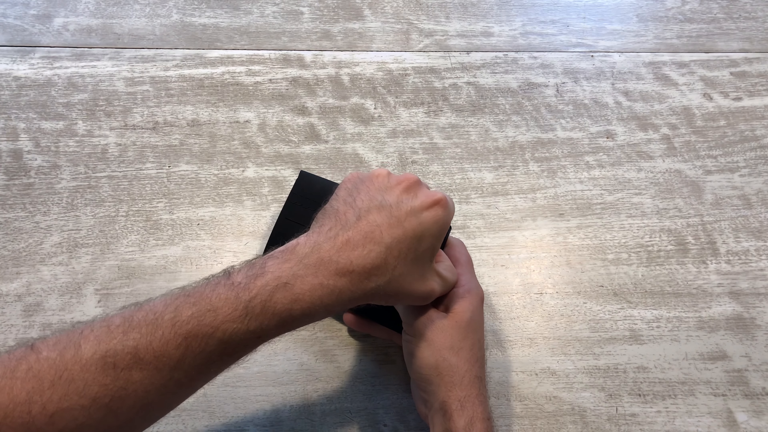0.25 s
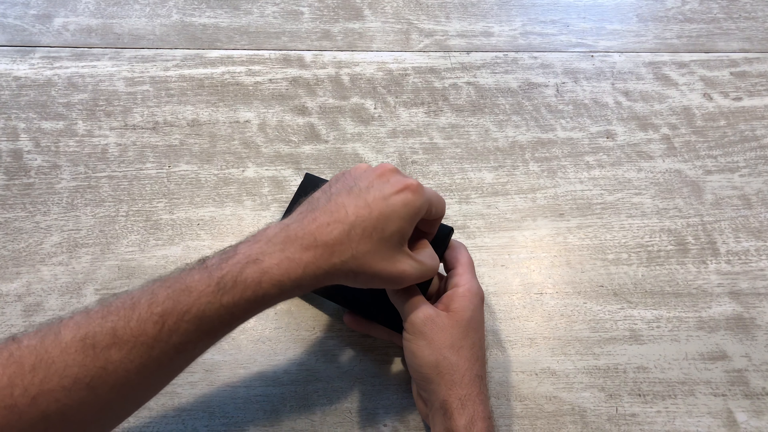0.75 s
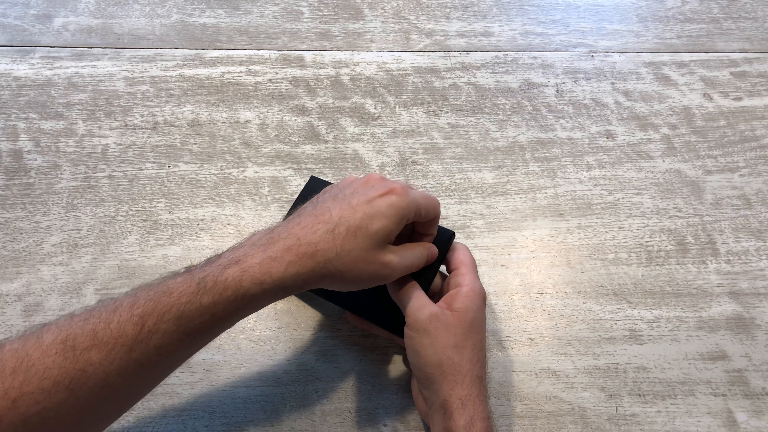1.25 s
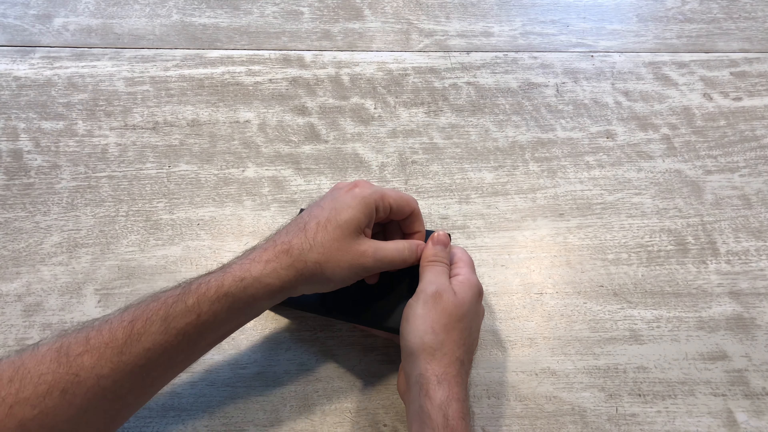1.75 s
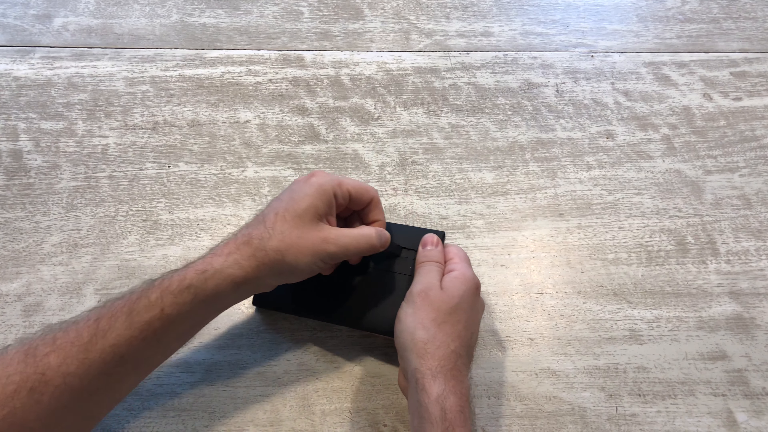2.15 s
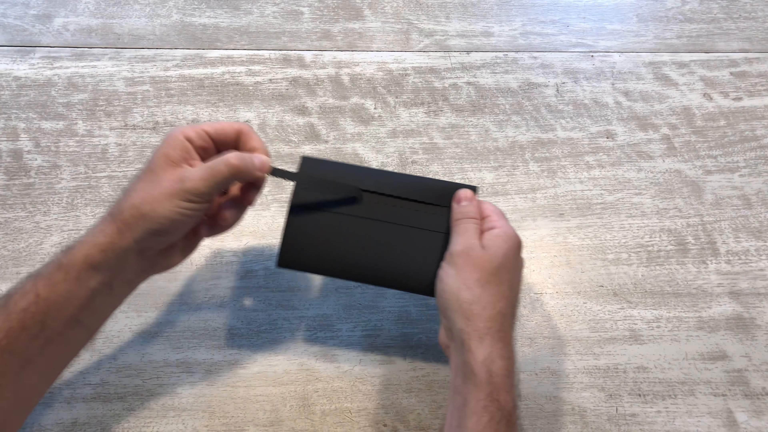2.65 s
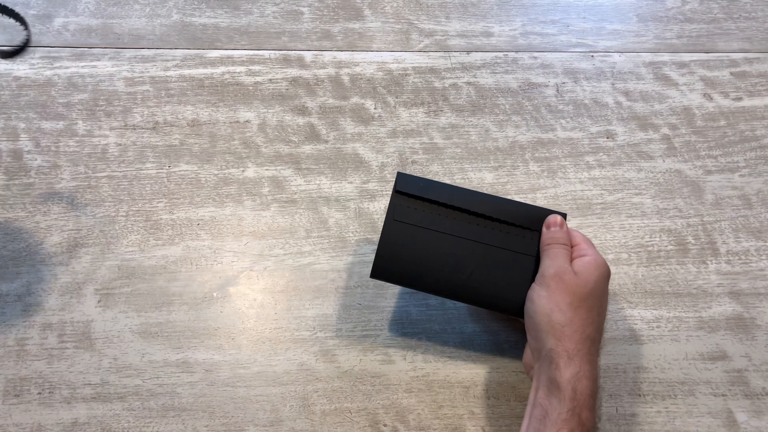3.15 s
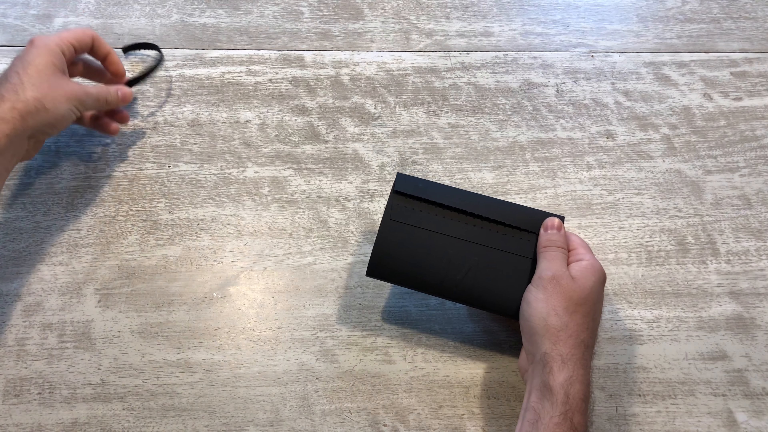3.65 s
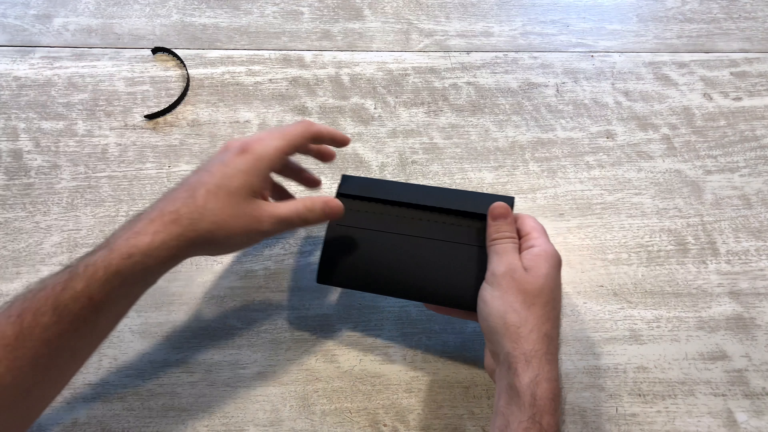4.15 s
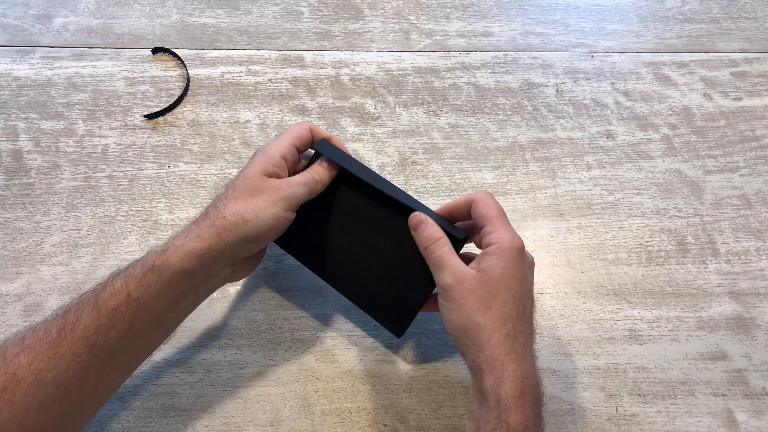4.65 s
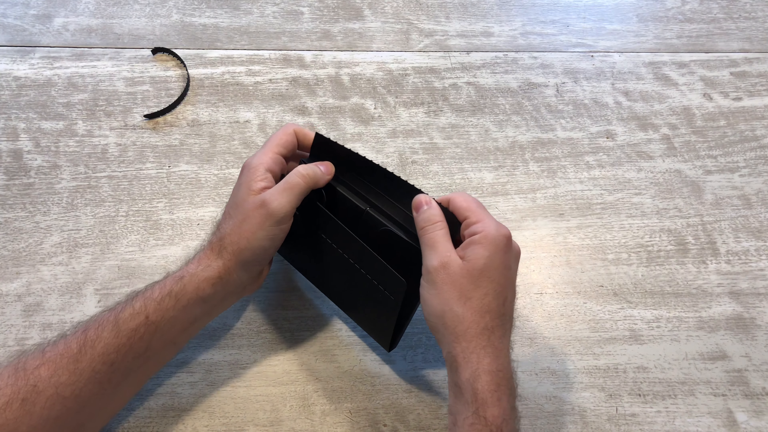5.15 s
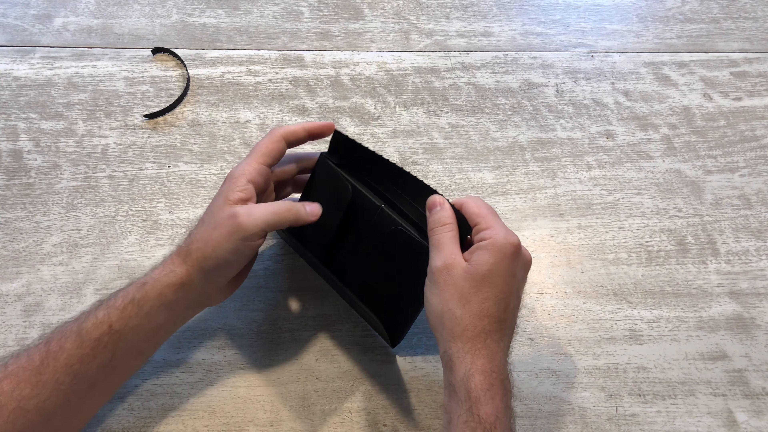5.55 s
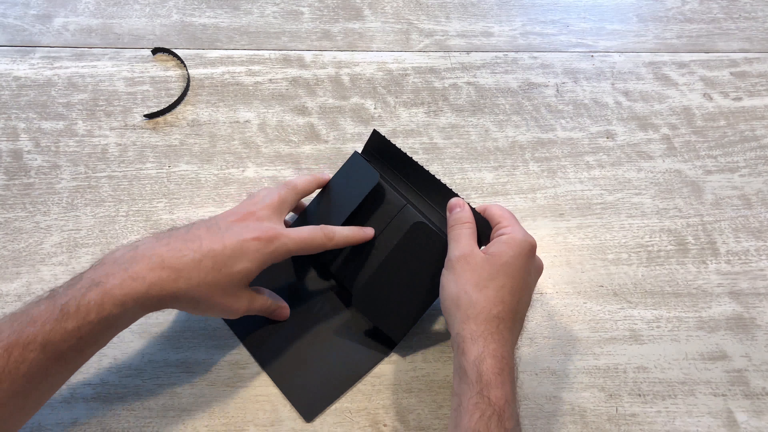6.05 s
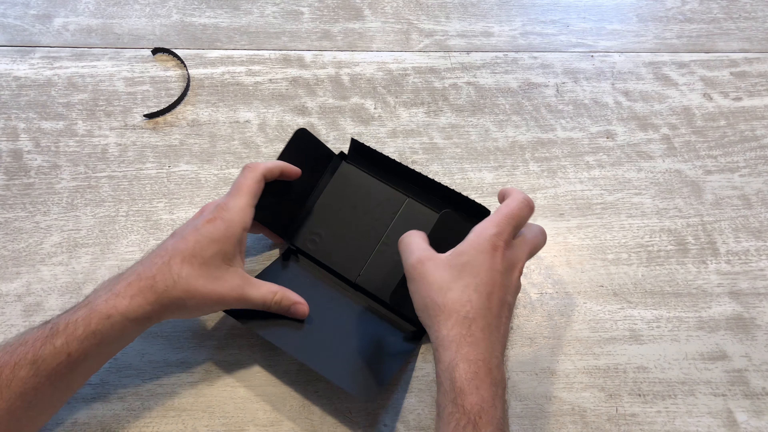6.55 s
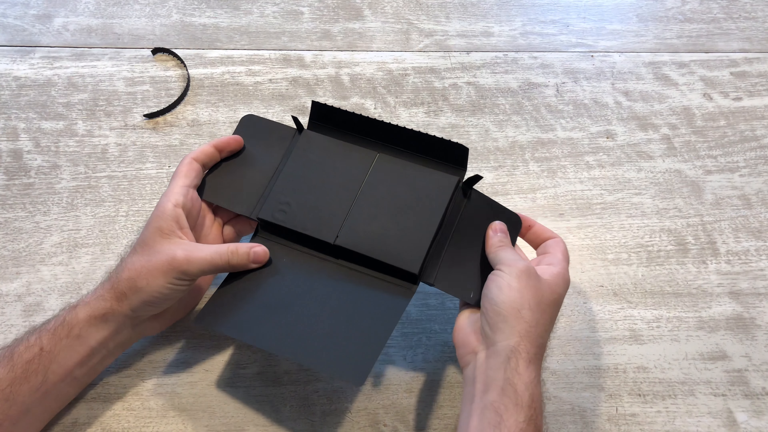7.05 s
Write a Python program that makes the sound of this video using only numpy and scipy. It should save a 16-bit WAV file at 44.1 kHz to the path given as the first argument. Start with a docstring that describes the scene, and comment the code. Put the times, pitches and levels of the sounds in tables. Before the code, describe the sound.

Hands pick at a small stiff cardboard box with nearly silent rubs and a few sharp clicks. Then perforations break one after another, quickening into a loud, bright tearing crackle with hollow knocks. After a quiet pause come a light tap, card scrapes, a couple of crisp pops and soft rustles as flaps open. Close microphone, bare lively room, faint rumble and hiss.

```python
"""Tear strip of a small cardboard box, close up

Hands pick at and pull a perforated strip off the box and fold the flaps open, close to the microphone.
Each paper bridge breaks with a crack of noise that knocks the hollow panels, modelled as resonances;
grainy noise rubs softly, card sings and squeaks, short low tones thump. A bare, lively room answers
after a short gap as noise dying band by band, over a faint low rumble and microphone hiss."""
import sys
import numpy as np
from scipy import signal
from scipy.fft import rfft, irfft
from scipy.io import wavfile
from scipy.ndimage import uniform_filter1d

SR = 44100
rng = np.random.default_rng(int(sys.argv[2]) if len(sys.argv) > 2 else 0)


def ratio_of_db(decibels):
    """Turn decibels (scalar or array-like) into linear amplitude factors; 0 dB maps to 1."""
    return 10 ** (np.asarray(decibels, float) / 20)


def store_pcm(level_fs):
    """Save levels as 16-bit WAV."""
    pcm = np.round(np.clip(level_fs, -1, 1) * 32767).astype(np.int16)
    wavfile.write(sys.argv[1], SR, np.atleast_2d(pcm).T)


N = 321577

# edges of third-octave bands, for the rubbing and the room [Hz]
EDGES_HZ = 20 * 2 ** np.arange(0, 9.8, 1 / 3)


def rms_one(x):
    """Scale to rms 1."""
    return x / np.sqrt(np.mean(x ** 2) + 1e-20)


def loudest_one(x, size):
    """Scale so that the loudest stretch of that many samples has rms 1."""
    return x / np.sqrt(uniform_filter1d(x ** 2, size).max() + 1e-20)


def at_hz(points, hz, column=1):
    """Read a table on a log-frequency axis."""
    points = np.array(points)
    return np.interp(np.log(np.maximum(hz, 1)), np.log(points[:, 0]), points[:, column])


def coloured(x, spectrum):
    """Weight the last axis by a spectrum in dB."""
    hz = np.fft.rfftfreq(x.shape[-1], 1 / SR)
    return irfft(rfft(x) * ratio_of_db(at_hz(spectrum, hz)), x.shape[-1])


def bandpass(x, low_hz, high_hz):
    """Second-order Butterworth band."""
    return signal.sosfilt(signal.butter(2, [low_hz, high_hz], "band", fs=SR, output="sos"), x)


def drift(rate_hz):
    """Slow random wander of rms 1: noise through a double pole, made at every 20th sample."""
    r = np.exp(-2 * np.pi * rate_hz * 20 / SR)
    noise = rng.standard_normal(N // 20 + 2002)
    slow = signal.lfilter([1], [1, -2 * r, r * r], noise)[2000:]   # skip the settling
    return np.interp(np.arange(N) / 20, np.arange(len(slow)), rms_one(slow))


def resonance(x, hz, width_hz):
    """Two-pole resonance, gain 1 on top."""
    r = np.exp(-np.pi * width_hz / SR)
    poles = [1, -2 * r * np.cos(2 * np.pi * hz / SR), r * r]
    return signal.lfilter([(1 - r * r) / 2, 0, (r * r - 1) / 2], poles, x)


def add(out, s, sound):
    """Lay a sound into the track at s seconds."""
    i = int(s * SR)
    out[i:i + len(sound)] += sound[:len(out) - i]


def snaps(fibre_db=2.5, tail_db=-19, tail_ms=3.0, reach=0.21):
    """Fibres part in a flurry of clicks and jolt the panels: direct sound, and the sum that fills the room."""
    # breaking bridges, ticks and creaks, levels before the low cut:
    # (time [s], crack [dB], brightness [dB per octave], knock [dB], struck panel [Hz])
    breaks = [(0.3505, -66, 3, -52, 820), (0.6232, -80, -8, -56.5, 736), (0.697, -65, 2.1, -56, 810),
              (0.7064, -24, -3, -24.5, 850), (0.853, -52.5, -11, -55, 785), (0.905, -58, -6, -55.5, 680),
              (0.9233, -54, 9, -55, 690), (1.496, -52.5, 4.5, -61, 500), (1.591, -51.5, 3.5, -59, 524),
              (1.7571, -23, -13, -28, 660), (1.7613, -23, -1, -20.5, 875), (2.13, -28.5, 2, -35, 820),
              (2.1376, -24.5, -5, -26, 740), (2.1801, -22, 3.5, -29.5, 690),
              (2.1872, -23.5, -4, -28.5, 1140), (2.2411, -31, -8.5, -34, 740),
              (2.3196, -27.5, -4, -37, 690), (2.3316, -23, -0.6, -27, 820),
              (2.3656, -25.5, -1.5, -32.5, 880), (2.3706, -22, -6, -23, 810), (2.3942, -17, -2, -27.5, 840),
              (2.3974, -18.5, 0.7, -24.5, 820), (2.4554, -30.5, -2, -29, 750),
              (2.458, -19.5, 1.1, -29, 790), (2.5146, -22, 0.1, -26, 820), (2.5541, -19.5, 4, -27.5, 983),
              (2.6343, -39, -13, -57, 915), (2.7048, -20, -1, -39, 820), (2.7065, -18, 5, -27, 830),
              (2.7336, -18.5, 0, -24, 1080), (2.753, -15, -1, -27, 1130), (2.7697, -13.5, 3, -22.5, 1020),
              (2.7875, -16, 0.5, -27.5, 1020), (2.8047, -15, 1.1, -52, 1420),
              (2.8204, -12.5, -0.3, -45, 770), (2.8228, -16, -1.5, -27, 660),
              (2.8397, -12.5, 1.6, -54, 1540), (3.0156, -25, -1, -37.5, 1100), (3.025, -16, 1, -32, 1220),
              (3.0409, -18.5, -2.5, -50, 1220), (3.0421, -19, -1.5, -44, 1380),
              (3.053, -18.5, -2, -25.5, 1150), (3.0597, -26, -3.2, -27, 560), (3.191, -46, -9.5, -47, 1190),
              (3.3676, -64, 9.5, -72.5, 750), (3.3995, -59.5, 0.5, -63.5, 712),
              (3.502, -64.5, 8, -73.5, 756), (3.7301, -62.5, -3.5, -57, 1064),
              (3.7992, -38.5, -2.7, -48, 1604), (3.8092, -46, 7, -51, 1345),
              (3.828, -53.5, -3.5, -56.5, 1300), (3.9312, -38, 6, -70, 1580), (3.992, -61, -1.2, -63, 1035),
              (4.2896, -61.5, -15, -53.5, 671), (4.366, -54, -6, -56.5, 708), (4.371, -49, -3, -51.5, 1080),
              (4.4469, -50.5, 2, -57, 1035), (4.4776, -53, 1, -71, 410), (4.548, -59, -13, -57.5, 420),
              (4.6495, -45, 5, -58, 640), (4.6713, -39.5, 4, -56, 1340), (4.6974, -52, -5, -66.5, 1320),
              (5.2431, -26, 2, -46, 2040), (5.2449, -34, 10, -55.5, 2030),
              (5.3662, -47.5, -8.5, -42.5, 327), (5.3707, -34.5, -6.5, -41.5, 1160),
              (5.4749, -28.5, -5.5, -31.5, 1140), (5.4819, -29.5, -14, -44.5, 1370),
              (5.491, -39, 7, -45, 2240), (5.5225, -42, -1, -44.5, 609), (5.5414, -42, -2, -43, 1110),
              (5.5524, -40, -6, -62, 1150), (5.9204, -47.5, -11, -46.5, 480), (5.9362, -55, -4, -58, 372),
              (5.9617, -52, -8, -59, 450), (6.0115, -61, -9, -58, 1250), (6.1326, -49, -4, -54.5, 1730),
              (6.1472, -47, -5.5, -60, 576), (6.245, -54, -19, -61, 895), (6.293, -49, -3, -49, 1220),
              (6.303, -50, -2, -68, 2100), (6.3218, -47, 1, -59, 2164), (6.3259, -44, -1.4, -58.5, 2110),
              (6.3419, -61, -7, -58, 397), (6.385, -59, -8, -53.5, 1120), (6.4665, -55, -6, -61, 437),
              (6.9073, -62, -10.5, -54.5, 1060), (7.0263, -54.5, -10.5, -49.5, 1630),
              (7.053, -64, 6, -56, 820), (7.082, -59, -8, -52.5, 980), (7.1037, -52.5, -6.5, -51, 1090),
              (7.139, -58, -5, -54, 850), (7.166, -58, -4.5, -54.5, 930), (7.2083, -59, -6, -52, 720)]
    # resonances of the box panels: (centre [Hz], relative level [dB], time to ring down 71 dB [s])
    panels = [(300, -3.5, .04), (424, 4.5, 0.12), (560, 3.5, 0.0079), (690, 2, 0.014), (820, 2, 0.014),
              (986, -7, 0.045), (1195, 0.5, 0.021), (1290, 2.5, 0.039), (1530, 4.5, 0.011),
              (2050, 13.5, 0.087)]
    # a hard break is brief, a weak one drags
    loud_db, loud_ms, longer_ms_per_db = -12, 1.8, .022

    size = 2048
    direct, around = np.zeros(N), np.zeros(N)
    ms = np.arange(size) / SR * 1000 - 1   # time from the break
    rows = np.concatenate([breaks, ticks(count=130)])
    tilts = rows[:, 2]
    fibres = rng.standard_normal((len(rows), size))
    fibres = fibres * ratio_of_db(fibre_db * rng.standard_normal((len(rows), size)))
    fibres = irfft(rfft(fibres) * crack_colours(tilts, spread_db=5.5, share=1))
    impulse = 1. * (np.arange(size) == 60)
    clicks = irfft(rfft(impulse) * crack_colours(0.89 * tilts, spread_db=6.0, share=0.41))
    luck = rng.standard_normal((len(rows), len(panels)))

    for (s, crack_db, _, knock_db, knock_hz), noise, click, draws in zip(rows, fibres, clicks, luck):
        length = max(loud_ms + longer_ms_per_db * (loud_db - crack_db), .3)
        rise = min(0.24 * length, .6)
        away = ms - 1.2 * rise
        hump = np.exp(-(away / np.where(away < 0, rise, .62 * length)) ** 2)
        fray = ratio_of_db(tail_db) * np.exp(-ms / tail_ms) * (ms > 0)   # loose fibres keep ticking
        crack = ratio_of_db(crack_db) * loudest_one(noise * (hump + fray), size=30)

        # the panel is yanked: slope of a Gaussian, quicker for a higher panel
        yank = (ms - min(length, 2.2) / 2 - .6) * knock_hz / 259.0
        push = np.diff(np.exp(-yank ** 2), prepend=0)
        knock = 0
        for (hz, level_db, ring_s), draw in zip(panels, draws):
            near = np.exp(-(np.log(hz / knock_hz) / reach) ** 2) + 0.38
            strength = near * ratio_of_db(level_db + 1.5 * draw) * np.sign(draw)
            knock = knock + strength * resonance(push, hz, 2.6 / ring_s)
        knock = ratio_of_db(knock_db) * loudest_one(knock, size=60)
        add(direct, s - .001, crack + knock)

        # all directions together sound smoother
        broad = resonance(push, knock_hz, 0.68 * knock_hz)
        add(around, s - .001, rms_one(click) * np.std(crack) + rms_one(broad) * np.std(knock))
    low_cut = signal.butter(2, 330, "high", fs=SR, output="sos")   # the snaps carry little below 330 Hz
    return signal.sosfilt(low_cut, direct), signal.sosfilt(low_cut, around)


def crack_colours(tilts, spread_db, share):
    """One spectrum a snap: the common colour, tilted, with the strip's resonances at strengths of their own."""
    # common colour of a crack: (frequency [Hz], relative density [dB])
    common = [(710, -17), (1200, -6.5), (1970, -10), (5100, -4), (7330, -7), (9030, -4), (11600, -5),
              (15300, -5.5), (16500, -21.5)]
    # resonances of the taut strip: (centre [Hz], half-width at 1/e [Hz], mean boost at share 1 [dB])
    strip = [(2266, 1000, 4), (3350, 860, 4.5), (5470, 850, 5.5), (6900, 1200, 4), (8880, 2300, 2.5),
             (12400, 720, -1)]
    hz = np.fft.rfftfreq(2048, 1 / SR)
    octaves = np.log2(np.clip(hz, 1500, 16000) / 5000)
    colour_db = at_hz(common, hz) + tilts[:, None] * octaves
    luck_db = spread_db * rng.standard_normal((len(tilts), len(strip)))
    for (centre_hz, width_hz, level_db), own_db in zip(strip, luck_db.T):
        peak = np.exp(-((hz - centre_hz) / width_hz) ** 2)
        colour_db = colour_db + share * (level_db + own_db[:, None]) * peak
    return ratio_of_db(colour_db)


def ticks(count):
    """Small ticks thrown off by rubbing at random moments, as strong as it allows; rows like the snaps."""
    when, size, tilt, hard, pitch = rng.random((count, 5)).T
    s = .01 + when * (N / SR - .02)
    crack_db = stroke_db(s, column=4) + 2 - 3 * np.log(size + 0.058)
    tilt_db = -6 + 8 * (tilt - .5)   # per octave
    knock_db = crack_db - 3.5 + 8 * (hard - .5)
    return np.transpose([s, crack_db, tilt_db, knock_db, 450 * 2.6 ** pitch])


def rubbing(grain_db=7.5, flicker_db=1.5, fine_under_hiss_db=-4.5):
    """Dense grains of skin on card: a rasp through the panels, a hiss and a finer hiss."""
    # colour of the hiss: (frequency [Hz], relative density [dB])
    hiss_colour = [(1470, -8.5), (2500, 3), (2990, -1.5), (3230, 2), (3630, -0.5), (8940, -4.5),
                   (15000, -8.5), (16000, -23.5)]
    # colour of the rasp: (frequency [Hz], relative density [dB])
    rasp_colour = [(88, -10), (150, -6.5), (257, -1.5), (901, -3.5), (1130, -2), (1590, -9), (1910, -7),
                   (2090, -7.5), (3500, -10.5), (4550, -31), (7700, -120)]
    t, coarse = np.arange(N) / SR, np.arange(0, N, 40) / SR
    rasp_db = np.interp(t, coarse, stroke_db(coarse, column=3))
    hiss_db = np.interp(t, coarse, stroke_db(coarse, column=4))
    grains = rng.standard_normal((2, N)) * ratio_of_db(grain_db * rng.standard_normal((2, N)))
    bright = coloured(grains, hiss_colour)
    rasp = patchy(coloured(grains, rasp_colour), 150, 4500, patchy_db=1.5)
    hiss = patchy(bright, 2000, 8500, patchy_db=1.5)
    fine = patchy(bright, 8000, 18000, patchy_db=1.2)
    hiss = hiss + ratio_of_db(fine_under_hiss_db + 1.9 * drift(8)) * fine
    flicker = ratio_of_db(flicker_db * drift(40) + 0.4 * drift(150))
    return flicker * (ratio_of_db(rasp_db) * rasp + ratio_of_db(hiss_db) * hiss)


def stroke_db(t, column):
    """Level of all strokes together: each swells to its peak and fades, straight in dB."""
    # skin and flap over card; swell and fade are the times for 18 dB, never under 2 ms:
    # (peak time [s], swell [s], fade [s], rasp [dB], hiss [dB])
    strokes = [(0.002, .01, 0.16, -69.5, -79), (.244, 0.021, .09, -71.5, -75),
               (0.352, 0.0091, 0.055, -62.5, -70), (.576, 0.012, .05, -74, -85), (.62, .01, 0.18, -73, -83),
               (.92, 0.038, 0.056, -65, -73), (1.09, 0.017, 0.072, -71, -79),
               (1.186, .04, 0.23, -72.5, -79.5), (1.334, 0.046, 0.16, -70, -70.5),
               (1.51, 0.072, 1, -69.5, -74), (1.751, 0.071, 0.02, -63.5, -68.5),
               (1.98, 0.21, 0.046, -63, -66.5), (2.119, 0.17, 0.012, -66.5, -67),
               (3.3, .03, 0.12, -64.5, -75), (3.398, .01, 0.13, -68.5, -72.5),
               (3.73, 0.0089, 0.061, -64.5, -74.5), (3.82, 0.024, 0.081, -59.5, -59.5),
               (3.93, 0.0073, 0.018, -59, -57), (3.96, .01, 0.19, -69.5, -69),
               (4.19, 0.044, .15, -74.5, -74.5), (4.292, 0.016, .05, -60, -75.5),
               (4.371, .01, .11, -59, -58), (4.452, 0.066, 0.14, -63, -60), (4.548, 0.06, 0.33, -64.5, -61),
               (4.68, 0.042, 0.049, -50, -49), (4.85, 0.21, 0.04, -59.5, -60),
               (4.99, 0.32, 0.094, -70, -68.5), (5.191, 0.083, .03, -63, -62),
               (5.542, 0.036, 0.13, -55.5, -55), (5.761, 0.24, 0.13, -60.5, -55),
               (5.92, 0.0091, 0.15, -63, -66), (6.06, .21, 0.31, -69.5, -68.5),
               (6.135, .01, 0.05, -64.5, -62), (6.256, 0.11, 0.017, -62, -56.5),
               (6.33, 0.06, 0.13, -56, -55.5), (6.54, 0.17, 0.36, -71, -67.5), (6.73, 0.18, 0.33, -68, -64),
               (6.871, 0.28, 0.2, -69, -65.5), (7.08, 0.21, 0.14, -77, -68.5),
               (7.211, 0.0086, 0.017, -57, -69.5), (7.28, .11, .11, -75, -74.5)]
    power = 1e-12
    for row in strokes:
        away = np.maximum((row[0] - t) / max(row[1], .002), (t - row[0]) / max(row[2], .002))
        power = power + ratio_of_db(row[column] - 18 * away) ** 2
    return 10 * np.log10(power)


def patchy(grains, low_hz, high_hz, patchy_db):
    """Third-octave bands, neighbours on unrelated grains, each wavering on its own; rms 1."""
    edges, out = EDGES_HZ[(EDGES_HZ > low_hz) & (EDGES_HZ < high_hz)], 0
    for k, (low, high) in enumerate(zip(edges, edges[1:])):
        out = out + bandpass(grains[k % 2], low, high) * ratio_of_db(patchy_db * drift(26))
    return rms_one(out)


def singing(fade_s=0.012, grain_db=7):
    """Rubbed or shaken card favours one resonance for a moment: noise twice through it."""
    # card left ringing by a blow, cut off after half its decay:
    # (time [s], centre [Hz], width of each pass [Hz], level at the start [dB], 60 dB decay [s])
    rings = [(3.067, 3600, 230, -69.5, 1.4), (3.796, 8170, 1000, -52.5, .27), (3.795, 1300, 990, -56, .45),
             (4.817, 1190, 470, -59, 0.46)]
    # rubbed card on one pitch: (start [s], end [s], centre [Hz], width of each pass [Hz], level [dB])
    whistling = [(4.38, 4.643, 5940, 1645, -67), (4.755, 4.869, 3680, 1300, -64),
                 (4.91, 5.002, 4850, 300, -74), (5.575, 5.803, 1170, 300, -63),
                 (5.653, 5.79, 2050, 800, -60), (5.801, 5.858, 1086, 340, -57),
                 (6.311, 6.361, 2870, 500, -60), (6.448, 6.484, 2700, 500, -64),
                 (6.701, 6.886, 5800, 2500, -63)]
    out = np.zeros(N)
    rows = [(s, s + t60 / 2, hz, width_hz, level_db, t60) for s, hz, width_hz, level_db, t60 in rings]
    rows = rows + [(*row, np.inf) for row in whistling]   # a whistle does not decay
    for start, end, hz, width_hz, level_db, t60 in rows:
        t = np.arange(int((end - start) * SR)) / SR
        grains = rng.standard_normal(SR) * ratio_of_db(grain_db * rng.standard_normal(SR))
        band = resonance(resonance(grains, hz, width_hz), hz, width_hz)[-len(t):]
        fade = np.clip(np.minimum(t, t[::-1]) / fade_s, 0, 1)
        add(out, start, rms_one(band) * fade * ratio_of_db(level_db - 60 * t / t60))
    return out


def squeak(waver_db=2.0):
    """A thin, faint, wavering tone that slides down."""
    from_s, to_s, start_hz, fall_hz_per_s, level_db = 3.265, 3.475, 11700, 7000, -82
    t = np.arange(N) / SR
    on = uniform_filter1d(1. * (t > from_s) * (t < to_s), size=800)
    hz = start_hz - fall_hz_per_s * (t - from_s) + 30 * drift(60)
    return on * ratio_of_db(level_db + waver_db * drift(30)) * np.sin(2 * np.pi * np.cumsum(hz) / SR)


def flap(beat_hz=23.8, partner_db=-6):
    """Two close modes of the freed flap die away together."""
    start_s, hz, level_db, t60_s = 5.249, 1990, -56.5, .4
    out, t = np.zeros(N), np.arange(SR // 4) / SR
    partner = ratio_of_db(partner_db) * np.sin(2 * np.pi * (hz + beat_hz) * t)
    pair = np.sin(2 * np.pi * hz * t) + partner
    add(out, start_s, ratio_of_db(level_db - 60 * t / t60_s) * pair)
    return out


def thumps(t60=0.035):
    """Low thumps, mostly under the snaps: short dying tones at 125 to 350 Hz."""
    # thumps: (time [s], peak before the band filter [dB], pitch [Hz])
    low_tones = [(2.137, -46.5, 157), (2.189, -37, 300), (2.371, -38.5, 187), (2.396, -32.5, 305),
                 (2.459, -33, 347), (2.554, -32.5, 346), (2.707, -45, 260), (2.735, -32.5, 348),
                 (2.768, -30.5, 340), (3.041, -31, 246), (3.056, -37.5, 318), (4.672, -46, 327),
                 (5.367, -38, 132), (5.477, -40, 125), (5.539, -42, 320), (5.919, -52.5, 334),
                 (6.324, -53, 277)]
    out, t = np.zeros(N), np.arange(6000) / SR
    for s, level_db, hz in low_tones:
        add(out, s, ratio_of_db(level_db - 60 * t / t60) * np.sin(2 * np.pi * hz * t))
    return bandpass(out, 95, 500)


def room(x, echo_s=0.0015, gap_s=0.0064, rise_s=0.0045):
    """Noise that dies band by band, starting after a gap and bunched where the first walls answer."""
    # the bare room: (frequency [Hz], 60 dB decay [s], gain before gap and walls [dB])
    decay = [(100, 1, -7.5), (260, 0.54, -4.5), (700, 0.44, -5), (1840, .55, -6), (4850, 0.48, -9.5),
             (8900, 0.32, -11), (14000, 0.33, -16)]
    # first walls: (delay [s], level over the dying noise [dB])
    walls = [(0.01, 9), (0.0165, 7), (.023, 0.5), (.03, 0)]
    t = np.arange(SR) / SR
    answer, white = np.zeros(SR), rng.standard_normal((2, SR))
    for k, (low, high) in enumerate(zip(EDGES_HZ[4:], EDGES_HZ[5:])):
        band = bandpass(white[k % 2], low, high)
        t60 = at_hz(decay, low)
        fall = ratio_of_db(at_hz(decay, low, column=2) - 60 * t / t60)
        answer += band * fall / np.sqrt(t60 * SR / np.log(1e6))   # same energy for any decay
    walls_db = sum(level_db * np.exp(-((t - s) / echo_s) ** 2) for s, level_db in walls)
    answer *= np.clip((t - gap_s) / rise_s, 0, 1) * ratio_of_db(walls_db)
    return signal.fftconvolve(x, answer)[:N]


def quiet():
    """Microphone hiss and air, over a low rumble that swells and fades, partly with the handling."""
    # colour of hiss and air: (frequency [Hz], relative density [dB])
    air_colour = [(120, -24), (200, 5), (799, -2), (1050, -12.5), (1270, -12), (2510, -16), (4700, -16),
                  (13000, -21), (15000, -19.5), (16500, -31.5)]
    # colour of the rumble: (frequency [Hz], relative density [dB])
    rumble_colour = [(12, -51), (20, -26.5), (27, -18.5), (29, -9.5), (35, -3), (48, -4.5), (65, 5.5),
                     (76, -1.5), (150, 4.5), (176, -3), (205, -5), (220, -9.5), (290, -38.5), (480, -120)]
    # swell of the rumble: (time [s], level [dB])
    rumble_level = [(0.0, -73), (0.79, -68.5), (1.08, -73.5), (2.13, -70), (2.46, -65.5), (3.04, -70),
                    (3.27, -68.5), (5.62, -72), (5.89, -69.5), (7.29, -72)]
    s, points_db = np.transpose(rumble_level)
    rumble_db = np.interp(np.arange(N) / SR, s, points_db)
    rumble = ratio_of_db(rumble_db) * rms_one(coloured(rng.standard_normal(N), rumble_colour))
    air = rms_one(coloured(rng.standard_normal(N), air_colour))
    return rumble + ratio_of_db(-73 + 1.0 * drift(0.79)) * air


def scene():
    """The box close to the microphone, the room around it."""
    direct, around = snaps()
    soft = thumps() + rubbing() + singing() + squeak() + flap()
    return (direct + soft + room(around + soft) + quiet())[None]


def band_limit(x):
    """A steep low-pass at the top of the band."""
    return signal.sosfilt(signal.butter(12, 17160, fs=SR, output="sos"), x)


def record(dry):
    """The extreme top is cut: 50 dB down from 17.3 kHz."""
    top_cut = signal.cheby2(8, 50, 17300, fs=SR, output="sos")
    mix = signal.sosfilt(top_cut, dry)
    return band_limit(mix)


dry = scene()
out = record(dry)
store_pcm(out)
```